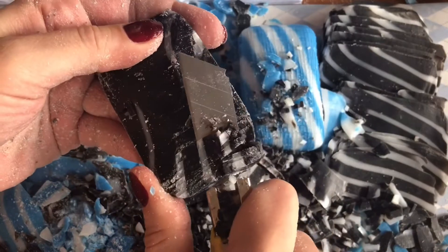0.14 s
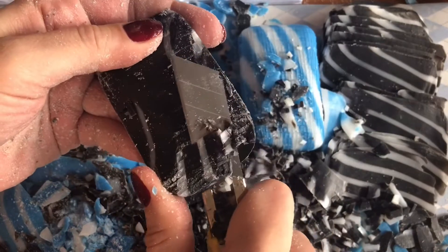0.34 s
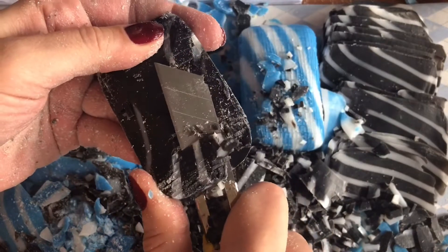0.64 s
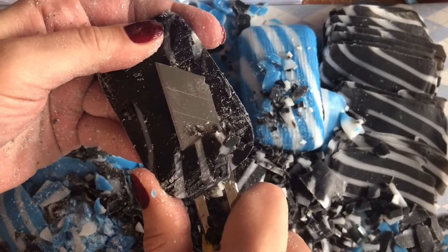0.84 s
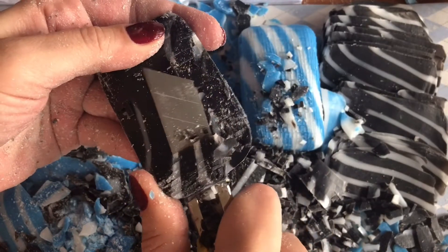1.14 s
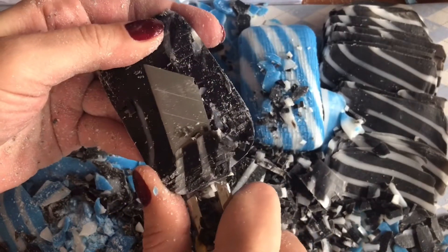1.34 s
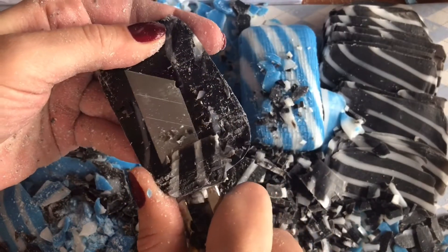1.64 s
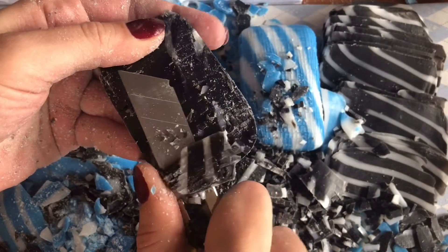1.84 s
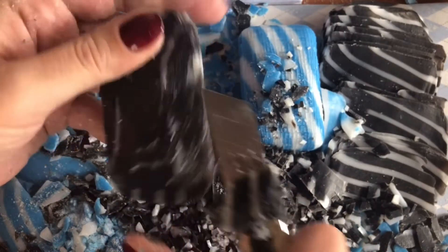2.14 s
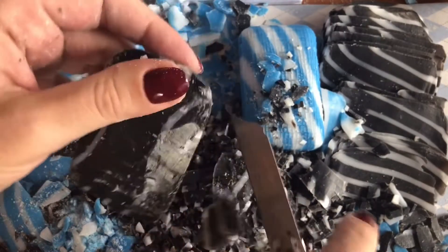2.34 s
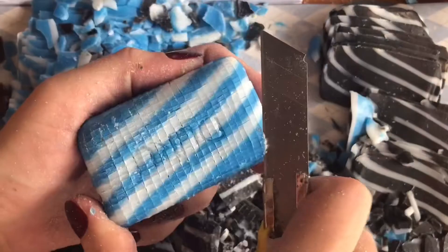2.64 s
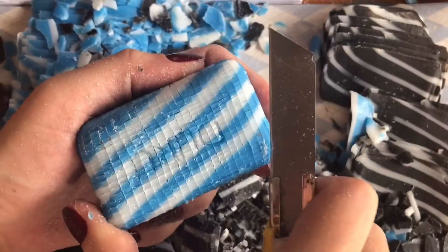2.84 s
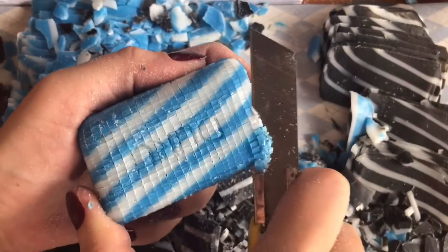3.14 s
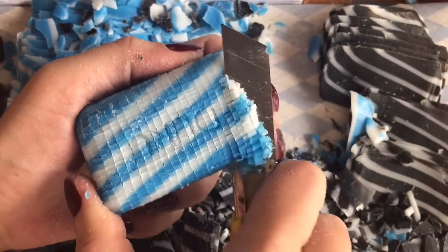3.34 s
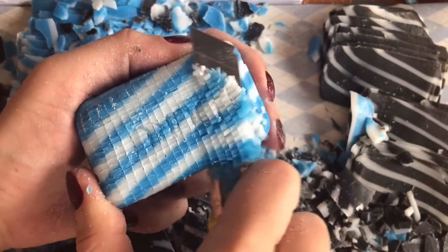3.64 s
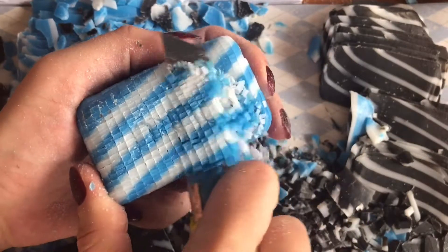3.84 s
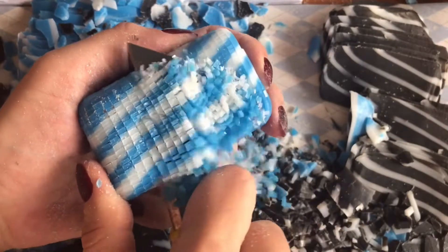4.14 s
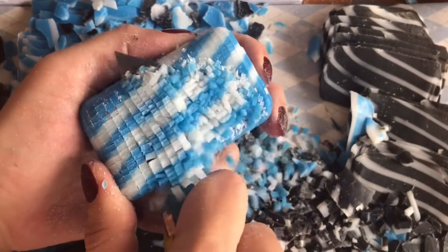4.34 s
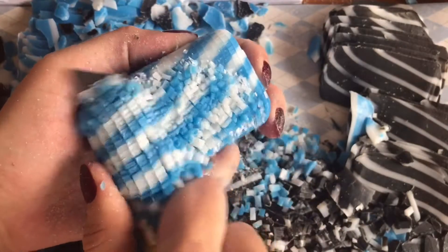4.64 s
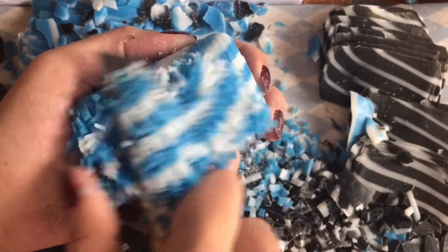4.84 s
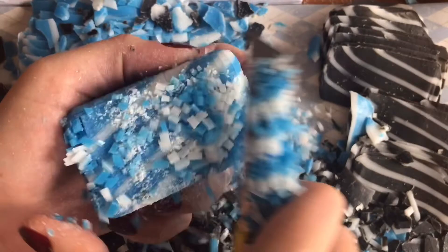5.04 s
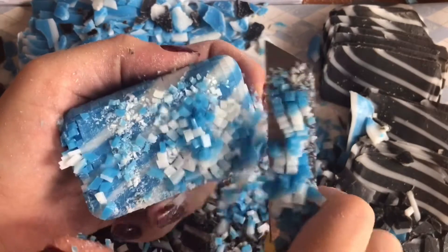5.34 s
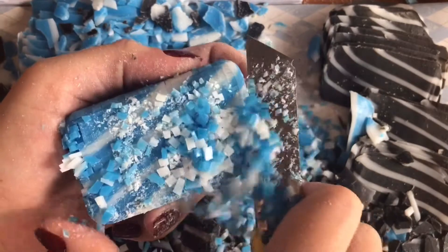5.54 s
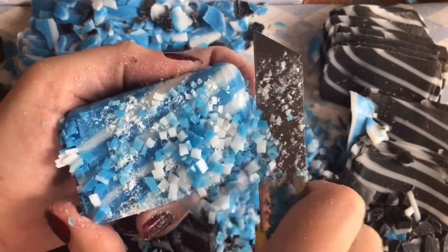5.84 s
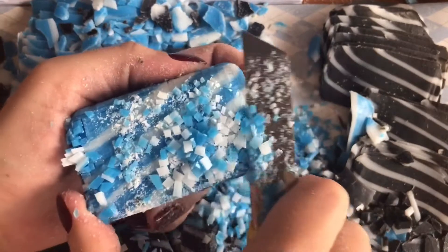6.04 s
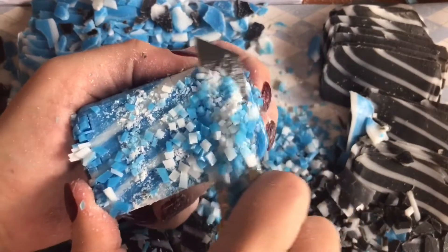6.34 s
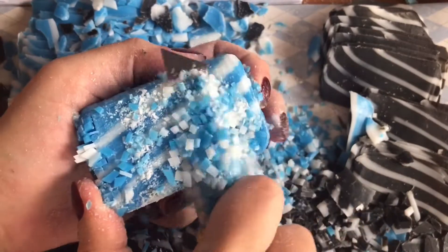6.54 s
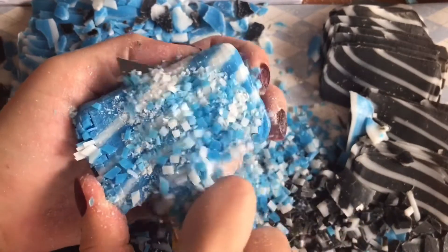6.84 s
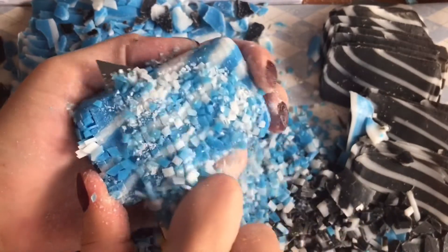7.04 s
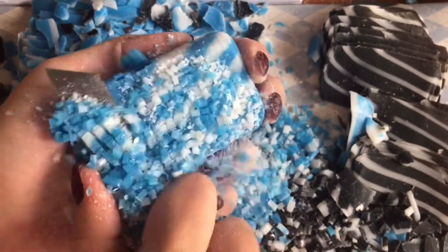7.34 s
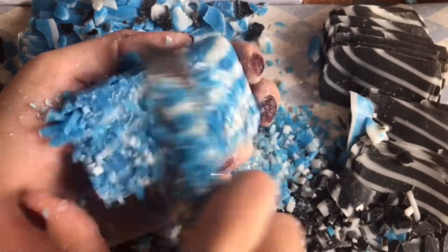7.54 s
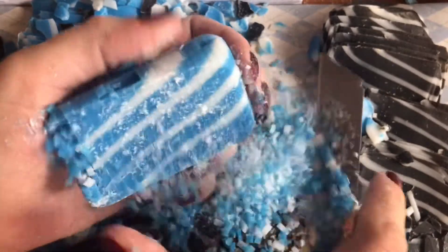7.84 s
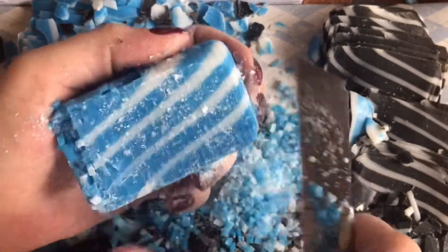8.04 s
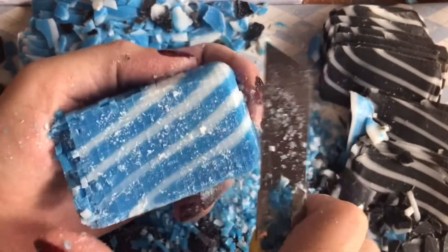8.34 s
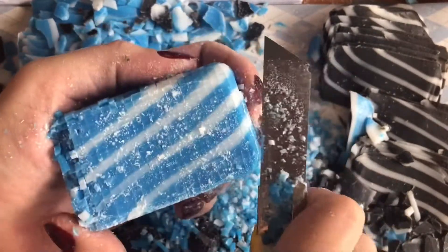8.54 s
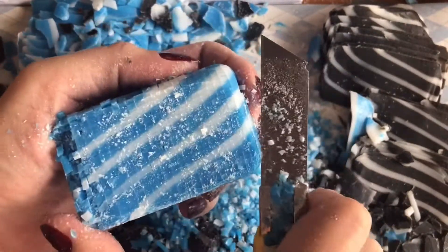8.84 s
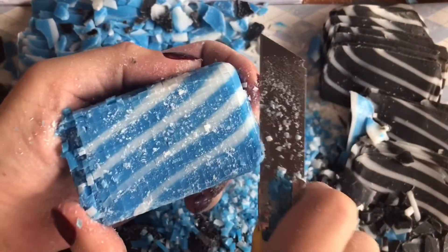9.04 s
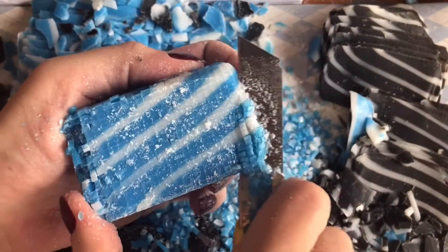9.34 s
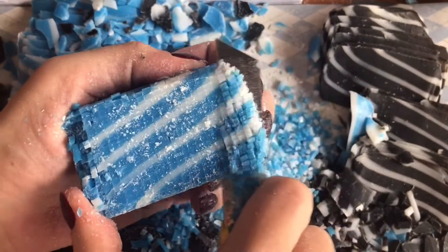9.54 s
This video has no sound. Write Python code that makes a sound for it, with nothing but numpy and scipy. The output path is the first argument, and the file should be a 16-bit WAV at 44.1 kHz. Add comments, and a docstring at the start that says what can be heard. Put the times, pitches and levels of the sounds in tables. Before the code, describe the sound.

Dry soap being cut by a small blade, heard intimately with almost no echo. Sparse faint taps and dull table thumps come first, then two main crunchy strokes, the first loudest, full of sharp snaps and brittle pops. Between them loose cubes tick and rustle on the heap. A brief sweep brushes crumbs away, quiet settles, and a third crackling cut begins and grows to the end.

```python
"""Soap cubes crack off a dry bar under a thin blade, tick onto a heap, and the blade sweeps crumbs away.
Cracks and crumbling are bursts and grains of noise; they ring the blade and bar, the knife or the loose cubes.
The free knife rings when touched, and its edge creaks upward at its first bite.
The push of the hands shakes the table top, which hums and thumps below.
All this is heard close up in a quiet room, with a short echo tail and steady background noise."""
import sys
import numpy as np
from scipy import signal
from scipy.fft import rfft, irfft, next_fast_len
from scipy.io import wavfile
from scipy.ndimage import uniform_filter1d

SR = 44100
rng = np.random.default_rng(int(sys.argv[2]) if len(sys.argv) > 2 else 0)


def store_pcm(level_fs):
    """Save levels as 16-bit WAV."""
    pcm = np.round(np.clip(level_fs, -1, 1) * 32767).astype(np.int16)
    wavfile.write(sys.argv[1], SR, np.atleast_2d(pcm).T)


N = 427329
T = np.arange(N) / SR   # time of every sample, s

# Cubes cracking off or landing; each part of the sound gets a further gain below.
# Each row: start in seconds, body level in dB, treble snap level in dB, low knock level in dB.
CRACKS = [(0.0327, -62.5, -57, -72), (0.4326, -58, -55, -49), (0.8434, -49, -61, -63),
          (0.9024, -54.5, -58, -72), (1.0221, -66.5, -54, -74), (1.3879, -50.5, -65, -40),
          (1.7917, -55.5, -48.5, -58), (1.8077, -60, -51, -57), (2.021, -45.5, -53, -47),
          (2.2024, -59, -50, -56), (2.2613, -71, -52, -58), (2.3414, -56, -43.5, -67),
          (2.4116, -50, -44, -56), (2.4179, -52, -48, -63), (2.4257, -44.5, -41.5, -46.5),
          (2.443, -56, -54, -61), (2.47, -47, -49, -61), (2.5088, -54, -51, -60), (2.5178, -54, -55, -51),
          (2.7462, -56, -54, -49), (2.7534, -49, -62, -47), (3.0107, -46, -52, -46.5),
          (3.097, -36.5, -47, -45), (3.1546, -51, -46.5, -60), (3.2684, -34, -33.5, -55),
          (3.2893, -38, -31, -54), (3.3, -31, -40, -61), (3.326, -31, -29, -59), (3.3568, -40, -35, -60),
          (3.3693, -34.5, -34.5, -51), (3.4507, -30, -28, -38), (3.4858, -31.5, -22.5, -42),
          (3.491, -29.5, -31, -49), (3.5097, -35, -39, -56), (3.522, -32, -28.5, -35.5),
          (3.533, -35, -38, -52), (3.57, -27, -27, -44), (3.6089, -33, -36, -61), (3.6321, -26, -29, -56),
          (3.6426, -26.5, -21.5, -53), (3.6513, -42, -35, -50), (3.6613, -30, -26, -51),
          (3.6879, -33, -28, -47), (3.6985, -27.5, -25, -32.5), (3.719, -33, -37, -46),
          (3.7288, -24, -16.5, -34), (3.7366, -19, -19, -42), (3.7559, -34, -27, -46),
          (3.778, -22.5, -21, -49), (3.785, -25, -24, -47), (3.8204, -24, -29, -51),
          (3.8445, -23, -21.5, -34), (3.8881, -22, -23, -39), (3.8984, -32, -23, -38),
          (3.9349, -28, -27, -35), (3.952, -26.5, -22, -38), (3.9705, -18.5, -24, -34),
          (4.0062, -26, -24, -34), (4.0289, -24.5, -24, -44), (4.0384, -23, -33, -34),
          (4.0649, -15, -23.5, -33), (4.0854, -19, -22, -32), (4.1268, -27, -25.5, -49),
          (4.174, -23.5, -25, -37), (4.1881, -17, -21, -32), (4.2053, -17.5, -27, -34),
          (4.225, -30, -26, -56), (4.2681, -23, -26, -52), (4.2767, -32, -35, -56),
          (4.286, -14, -22.5, -33.5), (4.3075, -23, -26, -42), (4.324, -44, -37, -56),
          (4.3489, -30, -31, -57), (4.3913, -29, -38, -55), (4.412, -29, -22.5, -41),
          (4.4232, -24, -36, -40), (4.4472, -24.5, -27, -39), (4.4578, -21, -38, -49),
          (4.4886, -29.5, -30, -49), (4.5033, -26.5, -33, -42), (4.5225, -24, -21, -44),
          (4.5772, -25.5, -36.5, -40), (4.5888, -33, -35, -49), (4.6032, -30, -36, -40),
          (4.6186, -30.5, -44, -59), (4.632, -32, -36, -52), (4.6552, -28, -37, -57),
          (4.685, -25.5, -26, -51), (4.6944, -29.5, -35, -29), (4.701, -26, -24, -52),
          (4.782, -54, -43, -53), (5.027, -50, -47, -57), (5.0703, -58, -34, -55), (5.095, -47, -37, -55),
          (5.1259, -40, -29, -62), (5.141, -41, -26, -64), (5.1634, -45, -31, -57), (5.1892, -44, -32, -57),
          (5.235, -50, -28, -71), (5.2583, -45, -30.5, -62), (5.273, -43, -47, -62),
          (5.3148, -55, -41, -62), (5.359, -53, -48, -67), (5.4582, -53, -53, -47.5),
          (5.4903, -53, -50, -53), (5.5708, -43, -32, -55), (5.5841, -46, -52, -41.5),
          (5.6476, -57, -42, -56), (5.7533, -74, -56, -51), (5.775, -69, -55, -71), (5.8899, -50, -29, -52),
          (5.901, -43.5, -36, -44), (5.9546, -56, -41.5, -52), (6.008, -55, -52, -65),
          (6.491, -54, -27, -55), (6.5522, -32.5, -28.5, -44), (6.7841, -29, -27.5, -46),
          (6.793, -29, -42, -47), (6.8013, -37, -41, -46), (6.817, -28, -31, -47), (6.8334, -35, -31, -44),
          (6.8456, -32, -28, -45), (6.859, -31, -29, -44), (6.9291, -34, -33, -58),
          (7.1322, -46, -39, -47.5), (7.1428, -43, -45, -55), (7.1589, -39, -23, -53),
          (7.2644, -33.5, -26, -51), (7.2825, -17.5, -20, -30), (7.4953, -37, -33.5, -37),
          (7.5479, -31.5, -34, -39), (7.6778, -39, -33, -37), (7.6955, -39, -35, -33.5),
          (7.8223, -48, -27, -55), (7.8526, -42, -31, -67), (7.8652, -47, -34, -64),
          (7.8742, -43, -32, -62), (7.8899, -54, -23.5, -60), (7.9339, -44, -34.5, -60),
          (7.9475, -42, -26, -53), (8.149, -59, -53, -48), (8.4228, -63.5, -55.5, -64.5),
          (8.6555, -63, -72, -57.5), (8.8024, -57.5, -53, -63), (9.1078, -44.5, -57, -37.5),
          (9.1658, -36, -45, -55), (9.1888, -38, -33.5, -41), (9.2183, -32, -28, -45),
          (9.2249, -29, -48, -41), (9.25, -35, -30.5, -43), (9.3199, -32, -41, -45), (9.348, -37, -38, -52),
          (9.362, -34, -30.5, -34), (9.4412, -33, -30, -37), (9.4593, -36, -34, -37),
          (9.4752, -38, -31, -56), (9.4869, -26.5, -23.5, -37), (9.4995, -26, -28, -51),
          (9.5083, -51, -38, -56), (9.5443, -33, -26, -52), (9.5557, -27, -27, -51), (9.572, -40, -29, -40),
          (9.5833, -28, -22, -44), (9.5961, -44, -25, -36), (9.6373, -30, -26, -36.5),
          (9.6799, -26, -26, -42)]
# How hard the soap crumbles, one curve for each gesture. Each row: time in seconds, level in dB.
CRUMBLE_CURVES = [
    [(0.0, -98), (1.9, -95), (2.05, -83), (2.14, -86), (2.42, -81), (2.58, -93), (2.77, -87.5),
     (2.93, -94.5)],
    [(3.08, -73), (3.21, -76.5), (3.32, -60.5), (3.44, -74), (3.52, -66.5), (3.62, -63.5), (3.74, -57.5),
     (4.31, -58), (4.56, -70.5), (4.7, -50), (4.78, -74)],
    [(4.88, -79.5), (5.03, -72), (5.16, -64), (5.4, -80), (5.67, -71.5), (5.85, -81.5), (6.07, -75)],
    [(6.13, -66), (6.19, -69.5), (6.3, -63), (6.46, -57.5), (6.76, -67), (6.85, -57), (7.11, -75.5),
     (7.3, -63), (7.45, -84)],
    [(7.55, -59.5), (7.71, -60), (7.78, -72.5), (7.89, -69), (8.11, -82), (8.33, -97)],
    [(9.01, -100.5), (9.14, -66), (9.22, -69), (9.43, -65), (9.5, -62.5), (9.55, -62), (9.69, -55)],
]
# Blade inside the soap. Each row: start in seconds, end in seconds.
CUTS = [(2.98, 4.73), (6.08, 7.15), (7.2, 7.31), (9.03, 9.7)]
# Blade flat over the cut face. Each row: start in seconds, end in seconds.
SWEEPS = [(7.48, 7.73)]
# Ringing tones (modes) of the blade held in the bar.
# Each row: pitch in Hz before small shifts, width in Hz, relative height in dB.
CUT_MODES = [(900, 110, -16), (1143, 24, -5.5), (1467, 360, -7.5), (1920, 26, -30), (2960, 190, -3),
             (3803, 70, 5), (4350, 350, 13.5), (5164, 200, 19.5), (7130, 100, -15), (8650, 1000, -23),
             (12880, 2400, -12.5)]
# Modes of the free knife, before the damping factor scales their width.
# Each row: pitch in Hz before small shifts, width in Hz, relative height in dB (used only in sweeps).
KNIFE_MODES = [(898, 24.5, 5), (1694, 51, 16), (2080, 100, 9), (3540, 71, 2), (4820, 85, 2.5),
               (6330, 180, 3.5), (6830, 41, 20), (7850, 420, 1)]
# Modes of loose cubes on the heap.
# Each row: pitch in Hz before small shifts, width in Hz, relative height in dB.
LOOSE_MODES = [(1000, 500, -4), (1900, 900, 0), (3300, 1200, -4), (5200, 1800, 0), (8200, 2200, 0),
               (11300, 2800, -1), (14300, 2500, -7)]
# Knock, body and snap, in that order. Each row: lowest frequency in Hz, highest frequency in Hz.
BANDS = [(750, 2500), (2500, 6500), (6500, 16000)]
# Free knife touched.
# Each row: start in seconds, blow level in dB before a small cut, pitch struck best in Hz,
# damping by the fingers as a factor on mode width.
TAPS = [(0.433, -46, 1640, 17), (1.388, -41, 2040, 8.8), (2.745, -40.5, 1890, 1.5), (8.461, -59, 1200, 1),
        (8.653, -53.5, 2000, 0.8), (8.802, -58, 4620, 0.99), (9.041, -48.5, 1197, 3.4)]
# Edge biting in. Each row: time in seconds, slip rate in Hz, level in dB; rate and level also waver.
CREAK = [(2.995, 976, -68), (3.011, 996, -63.5), (3.05, 1100, -68.5), (3.098, 1214, -65),
         (3.145, 1340, -98)]
# Dull thumps on the table: hand, or a bar put down.
# Each row: start in seconds, level in dB before the thud's own rise and fall, pitch in Hz.
THUMPS = [(0.433, -46, 114.7), (1.809, -60, 73), (2.414, -48, 152), (2.459, -47.5, 147), (2.751, -50, 680),
          (3.302, -53, 95), (4.713, -40.5, 88.4), (5.5, -50, 139), (7.29, -44, 72)]
# Long ringing tones of the table top.
# Each row: pitch in Hz, gain in dB, time to fade by 60 dB in seconds.
TABLE_MODES = [(118.8, -12.5, 1.), (168.8, -17, 0.54), (270, -10, 0.072)]
# Hands bearing down on the table.
# Each row: start in seconds, end in seconds, shake at start in dB, shake at end in dB.
PUSHES = [(1.78, 2.505, -73.5, -79), (3.008, 3.403, -77, -55.5), (3.4, 4.76, -57, -62.5),
          (5.5, 5.75, -70, -62), (5.93, 6.962, -65.5, -58), (6.945, 7.595, -62.5, -70.5),
          (9.126, 9.7, -66, -55)]
# Tone colour of the background noise. Each row: frequency in Hz, relative level in dB per Hz.
AIR_COLOUR = [(12, -58.5), (20, -42.5), (48, -6), (111, -6.5), (179, -4.5), (273, -13.5), (750, -15),
              (1140, -20), (1900, -25), (15200, -29), (16500, -37)]

AIR_DB = -71
USUAL_DB = -65   # crumbling level at which the shares below hold
# knock and snap against the body: dB in a cut, dB among loose cubes, share of the crumbling's swing
KNOCK_SHARE, SNAP_SHARE = (-0.22, -2, 0.87), (-3.5, -2.9, 1)
SMALL_COUNT = 420   # lesser cracks at random moments
# their level over the crumbling, its random spread, and its ceiling before the part gains
SMALL_DB, SMALL_SPREAD_DB, SMALL_TOP_DB = 14.5, 6.5, -40
TEAR_SPREAD = 0.27   # some breaks are clean, some tear slowly: spread of the log of their length
# over a cut the sinking blade rings higher (dB per octave) and more, and less of each crack sounds bare
DEPTH_TILT_DB, DEPTH_RING_DB, DEPTH_BARE_DB = 17.5, 3.5, -8
PUSH_FADE_S = 0.044
# crumbs and hands drum the table: base level, share of the crumbling's swing, smoothing, extra outside cuts
DRUM_DB, DRUM_FOLLOWS, DRUM_SMOOTH_S, SPILL_DRUM_DB = -69, 0.39, 0.16, 4.5
RATTLE_DB, RATTLE_S = -22.5, 0.055   # heap rattling around a thump: level against it, decay time
DIP_AT_S, DIP_RECOVERY_S, DIP_DB = 2.545, 0.012, -16
STOP_HZ = 16900   # from here up the treble is cut by at least 70 dB


def amp(db):
    """Turn a level in dB into a gain."""
    return 10 ** (np.asarray(db) / 20)


def rms_one(x):
    """Scale a sound to an average (rms) strength of 1."""
    return x / np.sqrt(np.mean(x ** 2) + 1e-20)


def band(x, low_hz, high_hz):
    """Keep mainly the frequencies between two limits, with a Butterworth filter."""
    return signal.sosfilt(signal.butter(3, [low_hz, high_hz], "band", fs=SR, output="sos"), x)


def resonate(x, hz, width_hz):
    """Ring one mode: a unit click starts a fading wave of height about 1; a wider mode fades faster."""
    radius = np.exp(-np.pi * width_hz / SR)
    turn = 2 * np.pi * hz / SR
    feedback = [1, -2 * radius * np.cos(turn), radius * radius]
    return signal.lfilter([.5, 0, -.5], feedback, x + 1e-18)


def during(spans):
    """Make a switch that is 1 inside the spans and 0 outside."""
    return sum((T >= a) * (T < b) * 1. for a, b in spans)


def wander(step_s):
    """Draw a new random value every step, with a spread of 1, and join them by lines."""
    knots = np.arange(0, N / SR + 1, step_s)
    return np.interp(T, knots, rng.standard_normal(4000)[:len(knots)])


def air():
    """Steady hiss and rumble of room and microphone: random noise with a shaped spectrum."""
    hz, db = np.transpose(AIR_COLOUR)
    size = next_fast_len(N)
    grid_hz = np.maximum(np.arange(size // 2 + 1) * SR / size, 1)
    colour = amp(np.interp(np.log(grid_hz), np.log(hz), db))
    shaped = irfft(rfft(rng.standard_normal(size)) * colour, size)
    return amp(AIR_DB) * rms_one(shaped[:N])


def crumbling():
    """Level of the crumbling in dB at every sample, joined from the gesture curves."""
    when, db = np.concatenate(CRUMBLE_CURVES).T
    return np.interp(T, when, db)


def breaks(at, levels, length_s):
    """A break is not one click but a short burst of noise that swells and dies."""
    size = 500
    age = np.arange(size) / (np.reshape(length_s, (-1, 1)) * SR)
    bursts = rng.standard_normal((len(at), size)) * age * np.exp(-age)
    energy = np.sum(bursts ** 2, axis=1, keepdims=True)
    bursts = levels[:, None] * bursts / np.sqrt(energy)
    out = np.zeros(N + size)
    np.add.at(out, at[:, None] + np.arange(size), bursts)
    return out[:N]


def grains(per_s, spread_db, clump_db):
    """Random clicks of uneven size that grow and shrink in clumps; rms 1."""
    clumps = rms_one(band(rng.standard_normal(N), 10, 50))
    born = rng.random(N) < per_s / SR
    sizes = amp(spread_db * np.minimum(rng.exponential(1, N), 4) + clump_db * clumps)
    return rms_one(born * sizes * rng.choice([-1, 1], N))


def voice(force, low, high, bare_db, change_db, shift):
    """What a force rings within one band: the blade in the bar, the knife pressed flat, or loose cubes."""
    cutting, sweeping = during(CUTS), during(SWEEPS)
    # 1 as the blade enters, 0 as it leaves
    shallow = sum(during([(a, b)]) * (b - T) / (b - a) for a, b in CUTS)
    bare_gain = amp(bare_db + DEPTH_BARE_DB * (cutting - shallow))
    out = np.sqrt(SR / 2 / (high - low)) * bare_gain * force
    middle_hz = np.sqrt(low * high)
    # when it sounds, what rings, and the damping factor on mode width
    states = ((cutting, CUT_MODES, 1), (sweeping, KNIFE_MODES, 3.2), (1 - cutting - sweeping, LOOSE_MODES, 1))
    for gate, modes, damping in states:
        inside = np.array([m for m in modes if low <= m[0] < high])
        # a mode's power grows with its height and width; the band's modes share the force
        power = amp(inside[:, 2]) ** 2 * inside[:, 1]
        for (hz, width, _), share in zip(inside, power / power.sum()):
            gain = np.sqrt(share * 2 * np.pi * width * damping / SR)
            tilt_db = DEPTH_RING_DB + DEPTH_TILT_DB * np.log2(hz / middle_hz)
            gain = gain * amp(-shallow * tilt_db)
            # each mode wavers at random: two shifted copies come and go
            for pull in (1 - shift, 1 + shift):
                favour = amp(change_db * (wander(.006) + .9 * wander(.15)))
                out += resonate(force * gate * gain * favour, hz * pull, width * damping)
    return band(out, low, 1.1 * high)


def soap():
    """Cracks and crumbling, as bursts and grains, drive the knock, body and snap together."""
    level, cutting = crumbling(), during(CUTS)
    fine = [USUAL_DB + follows * (level - USUAL_DB) + np.where(cutting, cut_db, loose_db)
            for cut_db, loose_db, follows in (KNOCK_SHARE, (0, 0, 1), SNAP_SHARE)]
    start_s, body, snap, knock = np.transpose(CRACKS)

    # add the lesser cracks to the listed ones
    small = rng.integers(0, N, SMALL_COUNT)
    chance = SMALL_SPREAD_DB * rng.standard_normal((SMALL_COUNT, 3))
    at = np.append(np.round(start_s * SR).astype(int), small)
    small_body = fine[1][small] + SMALL_DB + chance[:, 0]
    small_snap = fine[2][small] + SMALL_DB + 8 + chance[:, 1]
    small_knock = fine[0][small] + SMALL_DB - 7.5 + chance[:, 2]
    body = np.append(body, np.minimum(small_body, SMALL_TOP_DB))
    snap = np.append(snap, np.minimum(small_snap, SMALL_TOP_DB))
    knock = np.append(knock, np.minimum(small_knock, SMALL_TOP_DB))

    powder = grains(per_s=4000, spread_db=2.5, clump_db=1.0)
    crumbs = grains(per_s=250, spread_db=3.5, clump_db=6.5)   # single ticks out of the powder
    dust = powder + 0.67 * crumbs
    tear = np.exp(TEAR_SPREAD * rng.standard_normal(len(at)))
    # crack level in dB and usual time for a burst to swell in seconds
    parts = [(knock + 9, .0008), (body + 12, .0005), (snap + 9, .00045)]
    bare = -9, -9, -3   # dB: the share that rings no mode, before the blade sinks
    keep = np.exp(-1 / (0.004 * SR))
    out = 0
    for (low, high), (crack_db, length_s), fine_db, bare_db in zip(BANDS, parts, fine, bare):
        # splinters keep coming loose for a few ms after each crack
        starts = np.zeros(N)
        starts[at] = amp(crack_db - 32.5)
        trail = signal.lfilter([1], [1, -keep], starts)
        force = breaks(at, amp(crack_db), length_s * tear) + dust * (trail + amp(fine_db))
        out = out + voice(force, low, high, bare_db, change_db=4.5, shift=0.018)
    return out


def table():
    """The push shakes the top as lumpy low noise, crumbs drum it; shake, drumming and thumps ring its modes."""
    push = sum(during([(a, b)]) * amp(np.interp(T, [a, b], [from_db, to_db]))
               for a, b, from_db, to_db in PUSHES)
    push = uniform_filter1d(push, int(PUSH_FADE_S * SR) + 1)
    shake = push * amp(2 * wander(0.11)) * rms_one(band(rng.standard_normal(N), 64, 105.9))

    busy_db = uniform_filter1d(crumbling(), int(DRUM_SMOOTH_S * SR) + 1) - USUAL_DB
    drum_db = DRUM_DB + DRUM_FOLLOWS * busy_db + SPILL_DRUM_DB * (1 - during(CUTS))
    rattle = sum(amp(db + RATTLE_DB) * (T >= s) * np.exp(-np.abs(T - s) / RATTLE_S) for s, db, _ in THUMPS)
    drumming = (amp(drum_db) + rattle) * rms_one(band(rng.standard_normal(N), 110, 434))

    thuds, blows = np.zeros(N), np.zeros(N)
    for s, db, hz in THUMPS:
        turns = np.maximum(T - s, 0) * hz   # wave cycles since the thump
        swell = np.minimum(turns, 1) * np.exp(-turns / 3.25)
        thuds += amp(db) * np.sin(2 * np.pi * turns) * swell
        blows[round(s * SR)] = amp(db)
    drive = band(blows, 67, 400) + amp(-45.0) * (shake + drumming)
    modes = sum(amp(db) * resonate(drive, hz, np.log(1000) / np.pi / t60) for hz, db, t60 in TABLE_MODES)
    return shake + drumming + thuds + modes


def knife():
    """Taps ring the free knife most near the pitch struck best; the first bite creaks up with odd partials."""
    taps = np.zeros(N)
    for s, db, best_hz, damping in TAPS:
        at, size = round(s * SR), 4000
        blow = breaks(np.array([0]), amp([db - 2.5]), 0.00006)[:size]
        for hz, width, _ in KNIFE_MODES:
            gain = amp(-7 * abs(np.log2(hz / best_hz)))   # 7 dB weaker for each octave away
            taps[at:at + size] += gain * resonate(blow, hz, width * damping)

    when, slip_hz, creak_db = np.transpose(CREAK)
    rate = np.interp(T, when, slip_hz) * (1 + .015 * wander(.003))
    phase = 2 * np.pi * np.cumsum(rate) / SR
    level = amp(np.interp(T, when, creak_db, -200, -200) + 6 * wander(.004))
    creak = level * (np.sin(phase) + .7 * np.sin(3 * phase) + .3 * np.sin(5 * phase))
    return taps + creak


def room(x, t60, level_db):
    """A short diffuse echo tail off the table and walls, made of fading noise."""
    age = np.arange(int(.2 * SR)) / SR
    tail = rng.standard_normal(len(age)) * amp(-60 * age / t60)
    tail = tail / np.sqrt(np.sum(tail ** 2))
    return amp(level_db) * signal.fftconvolve(x, tail)[:N]


def scene():
    """Add soap and knife, their echo tail, the table and the air at one microphone."""
    near = soap() + knife()
    echo = room(near, t60=0.084, level_db=-13)
    return (near + echo + table() + air())[None]


def record(dry):
    """The level dips briefly and comes back; a steep filter cuts the highest treble."""
    recovery = np.exp(-np.maximum(T - DIP_AT_S, 0) / DIP_RECOVERY_S)
    dip = amp(DIP_DB * (T >= DIP_AT_S) * recovery)
    return signal.sosfilt(signal.cheby2(12, 70, STOP_HZ, fs=SR, output="sos"), dry * dip)


dry = scene()
out = record(dry)
store_pcm(out)
```